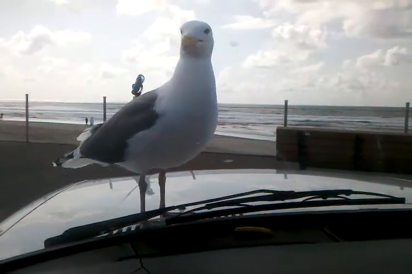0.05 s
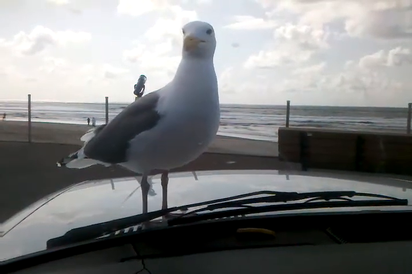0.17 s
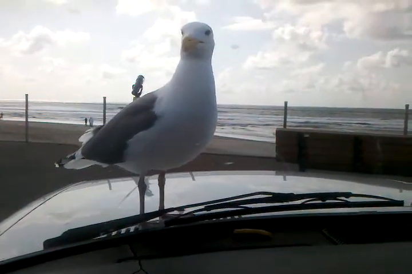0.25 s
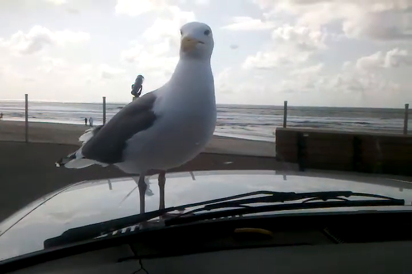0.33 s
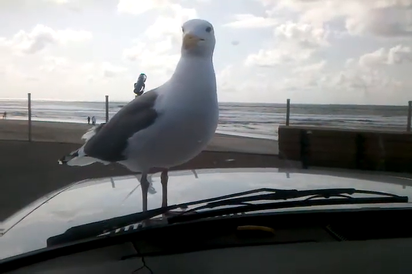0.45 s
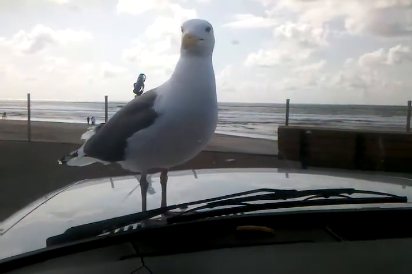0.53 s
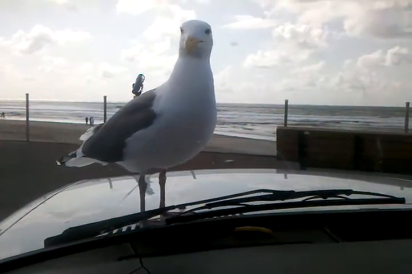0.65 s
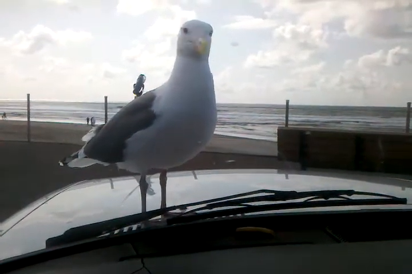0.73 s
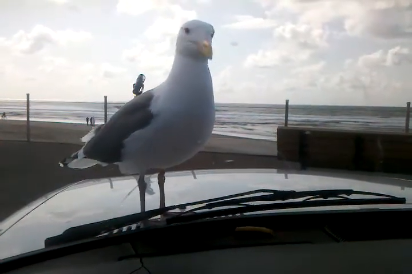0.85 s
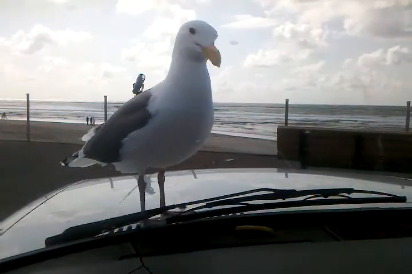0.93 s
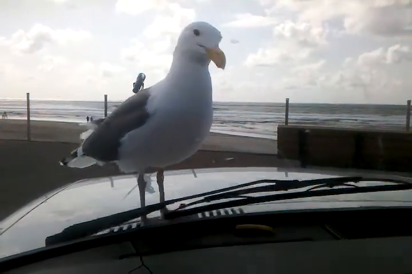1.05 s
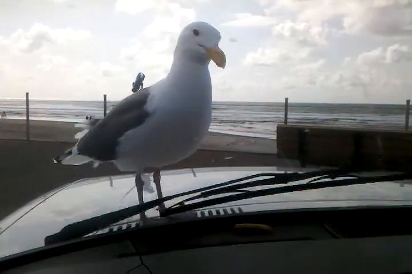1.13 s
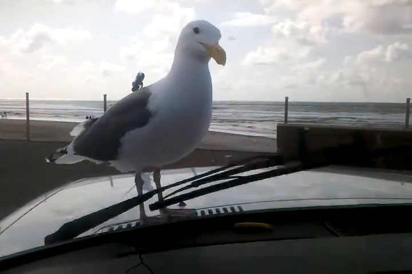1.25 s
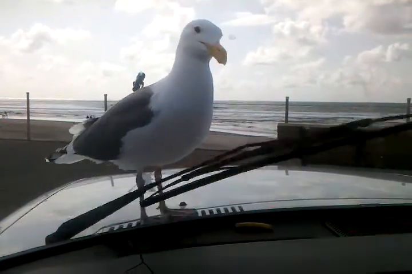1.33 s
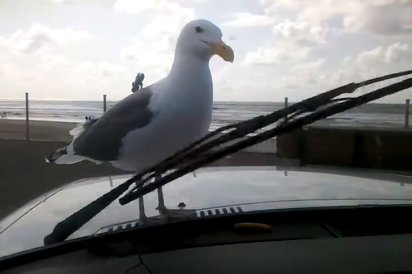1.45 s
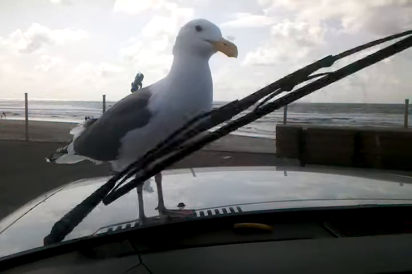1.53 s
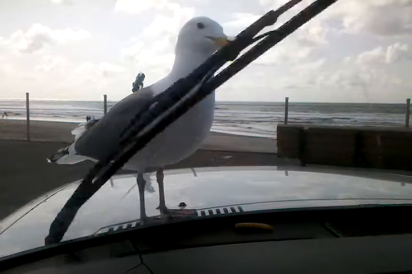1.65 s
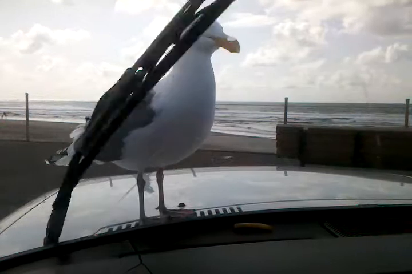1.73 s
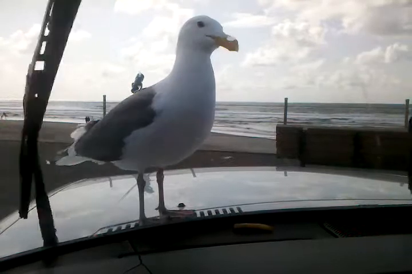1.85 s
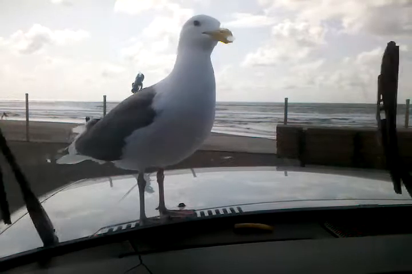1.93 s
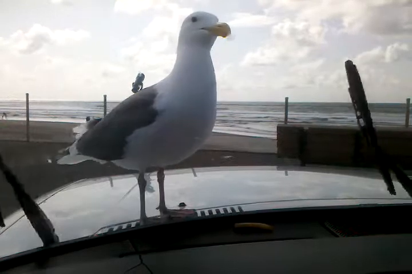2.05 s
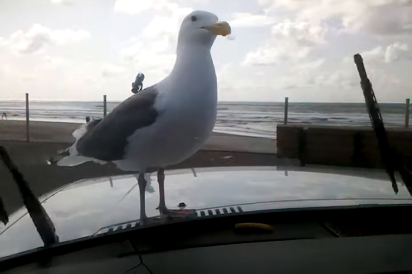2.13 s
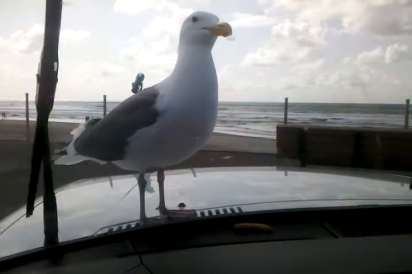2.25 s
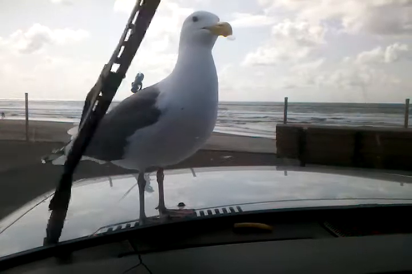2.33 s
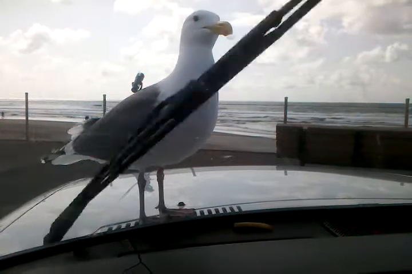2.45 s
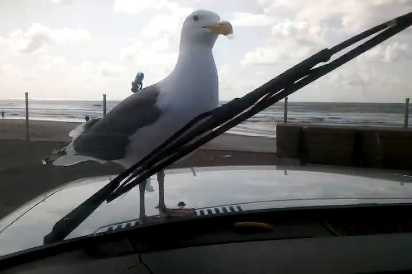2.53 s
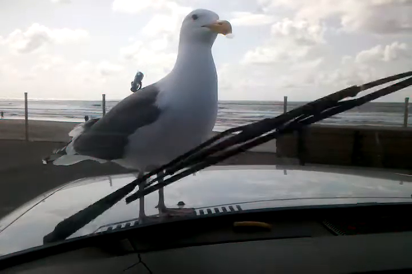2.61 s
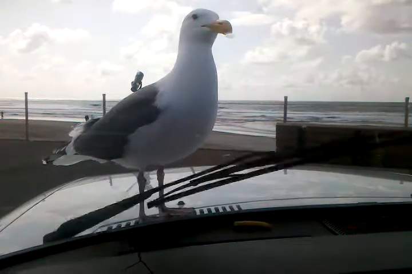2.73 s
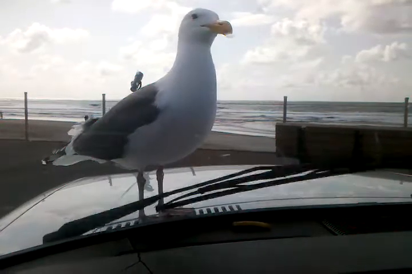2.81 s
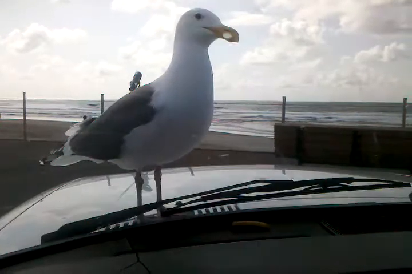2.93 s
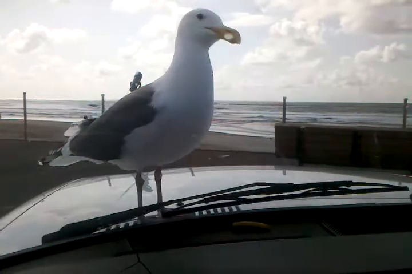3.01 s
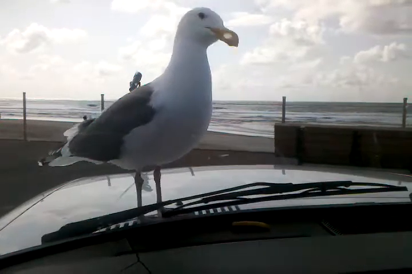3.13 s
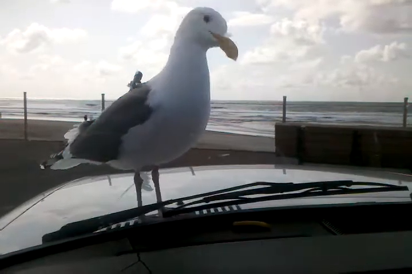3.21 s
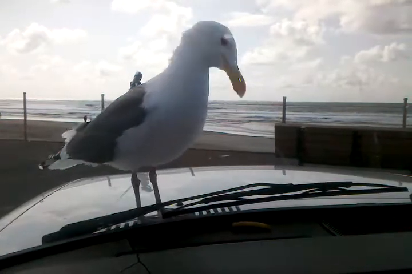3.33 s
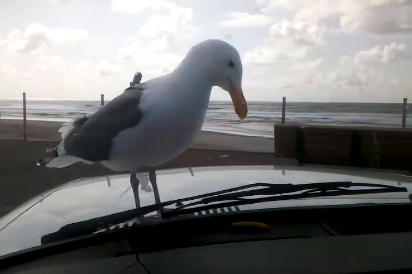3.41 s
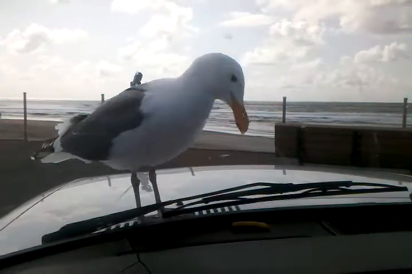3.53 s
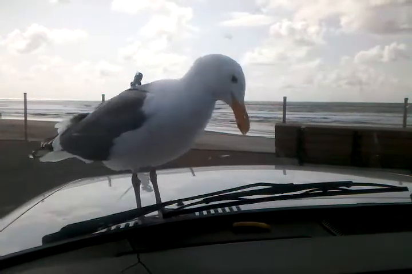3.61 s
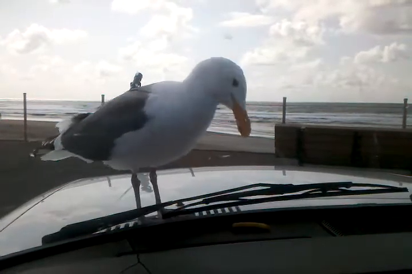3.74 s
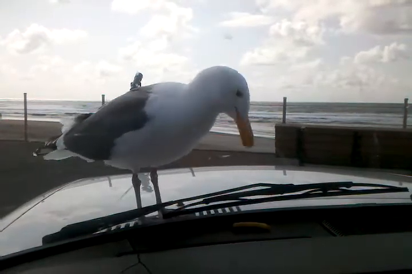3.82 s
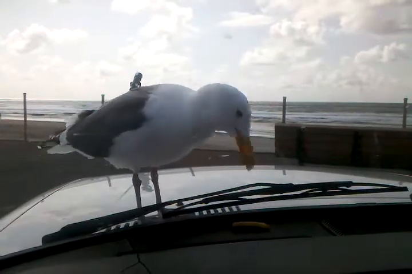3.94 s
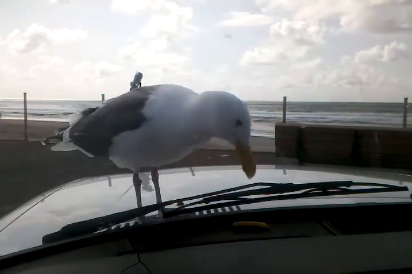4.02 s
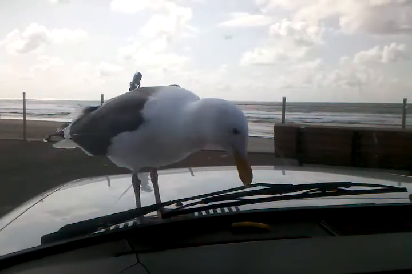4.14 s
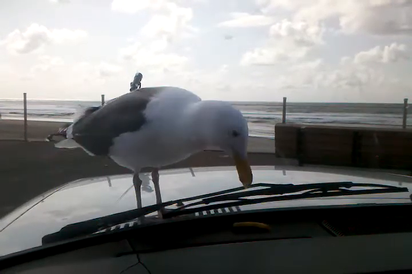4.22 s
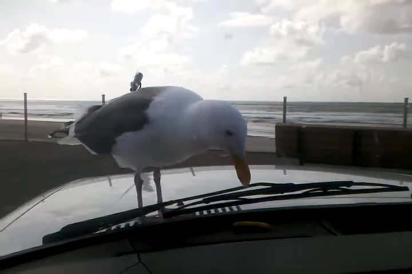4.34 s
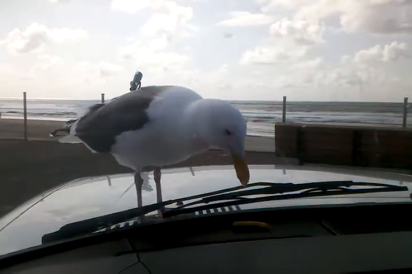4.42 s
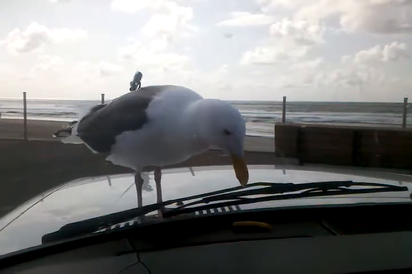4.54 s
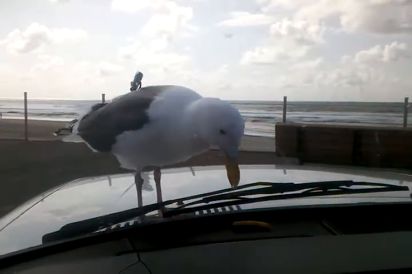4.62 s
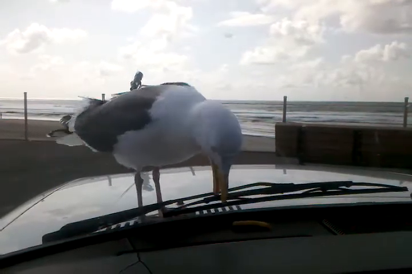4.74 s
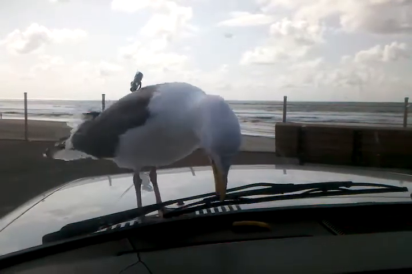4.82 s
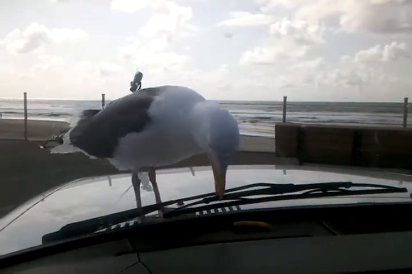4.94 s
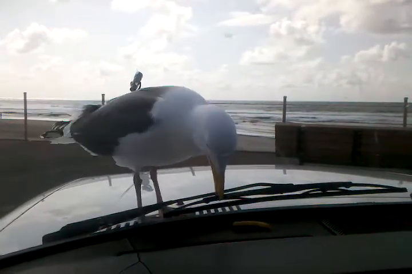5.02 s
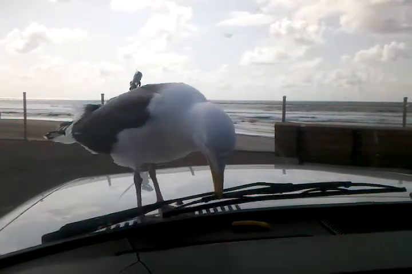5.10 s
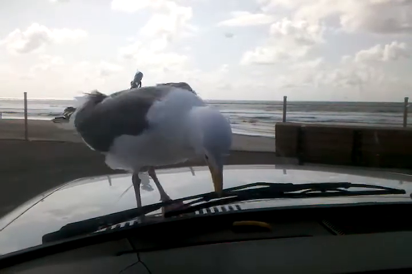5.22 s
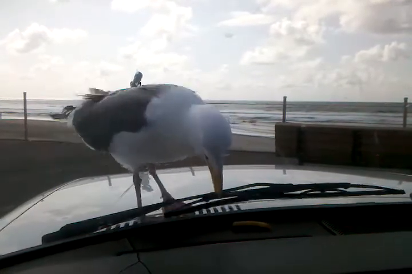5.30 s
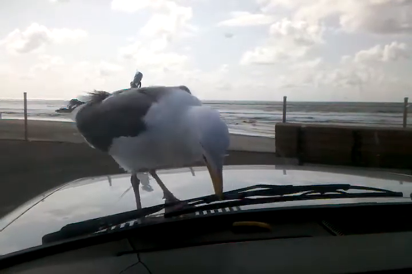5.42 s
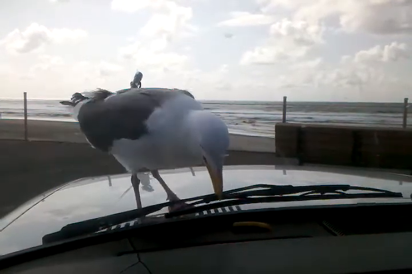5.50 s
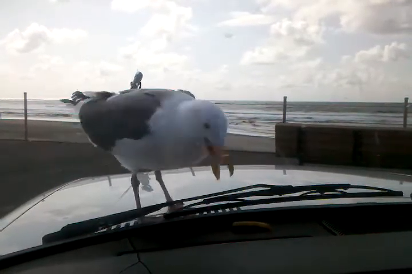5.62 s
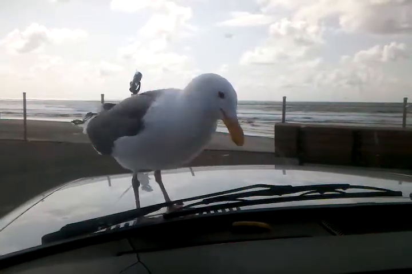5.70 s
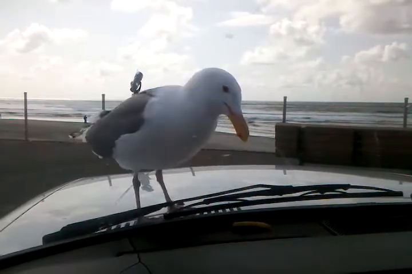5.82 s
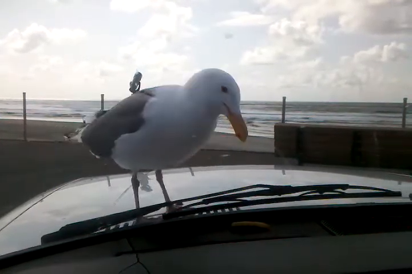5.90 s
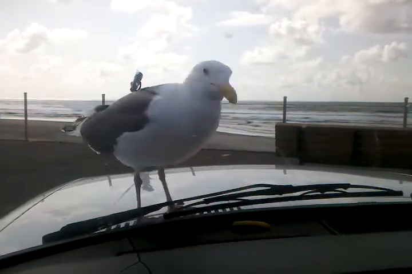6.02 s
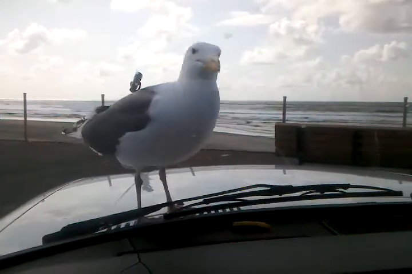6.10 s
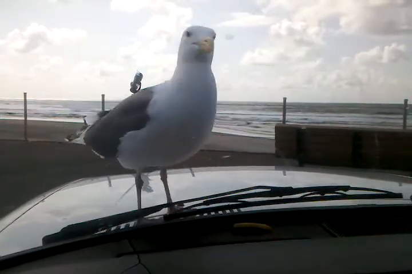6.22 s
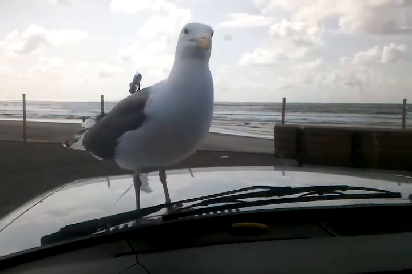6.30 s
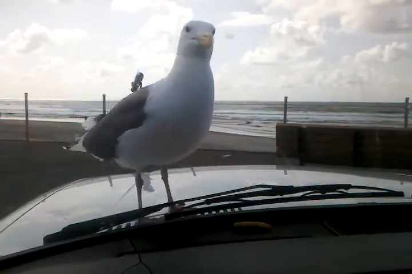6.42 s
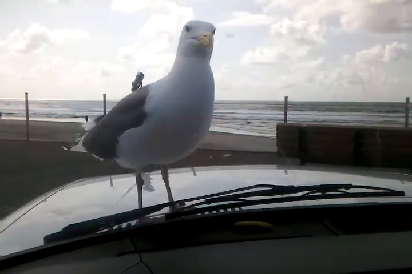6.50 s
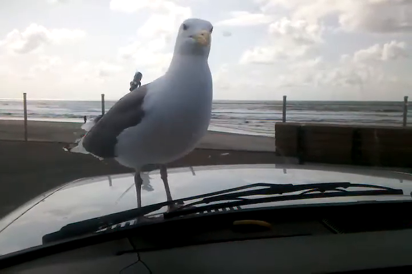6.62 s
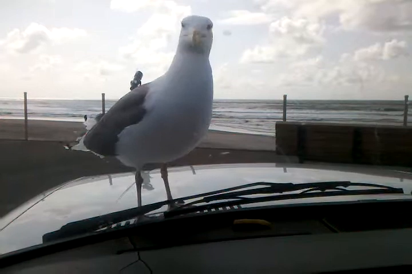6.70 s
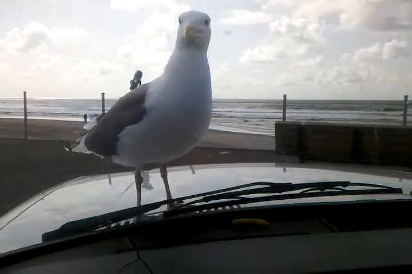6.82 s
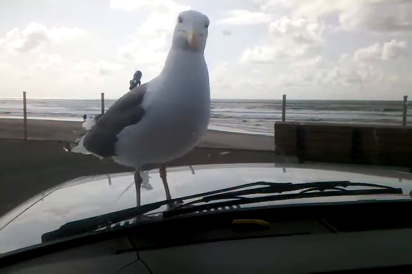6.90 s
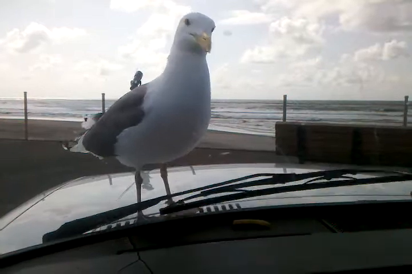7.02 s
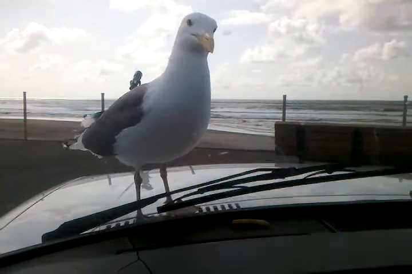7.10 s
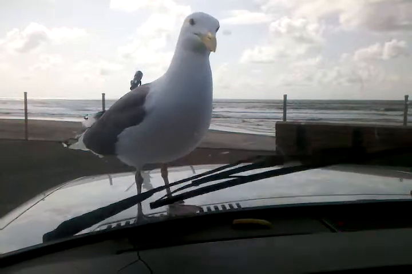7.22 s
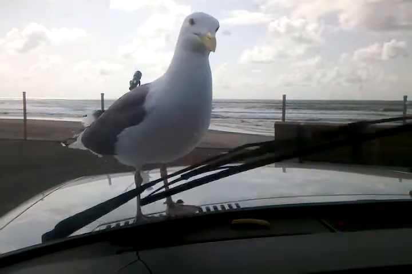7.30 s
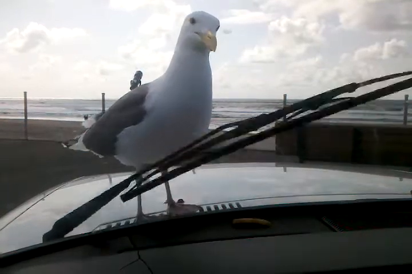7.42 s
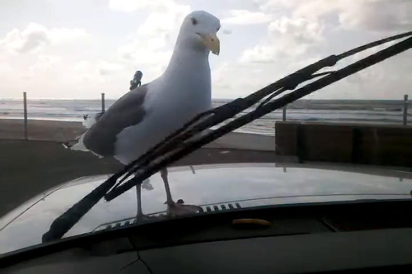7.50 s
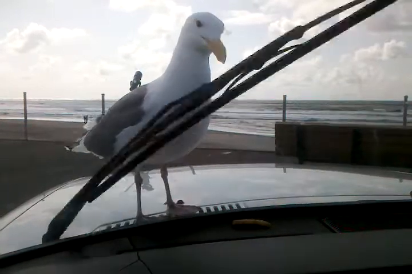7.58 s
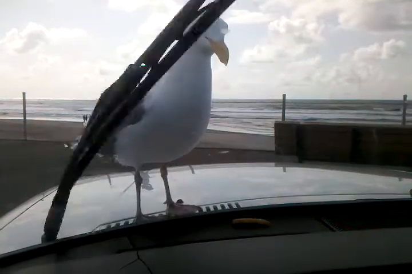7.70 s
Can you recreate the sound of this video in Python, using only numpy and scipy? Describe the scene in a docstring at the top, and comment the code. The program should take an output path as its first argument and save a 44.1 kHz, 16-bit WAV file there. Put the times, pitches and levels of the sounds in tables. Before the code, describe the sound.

Inside a closed car parked by the sea, steady, low, muffled surf with a faint hiss runs throughout. At about 1.1 s the wipers start: light ticks, then dull clunks at 1.2-1.4 s, low linkage rumble, and a soft gear whine and rubber swish swelling towards 1.8 s. A thin, wavering, high squeal appears around 1.9 s. Stronger clustered clunks mark the reversal at 2.35-2.45 s, followed by a quieter return and a small knock at 3.2 s. Only surf remains until the gull raps the hood at 5.0 and 5.1 s: hard, short, hollow metallic knocks. Soft foot thuds follow, heaviest at 5.7 s, then a third peck at 5.86 s with more cabin boom. A tiny grainy rustle passes at 6.4 s. From 7.1 s the wipers knock, chirp briefly and swish again until the end. The microphone is thin in bass and cut in the highs.

```python
"""Inside the cabin of a car parked by the sea, muffled surf (coloured noise) throughout; a gull is on the hood.
The wipers sweep out and back: knocks (damped sines, noise bursts), gear whine and swish (noise bands that follow
the blade speed), squeal (wavering tone). The gull then pecks the sheet metal three times (clicks into panel modes)
and stamps about (soft thuds); a brief grainy rustle follows, and the wipers start again."""
import sys
import numpy as np
from scipy import signal
from scipy.fft import rfft, irfft
from scipy.io import wavfile
from scipy.ndimage import uniform_filter1d

SR = 44100
rng = np.random.default_rng(int(sys.argv[2]) if len(sys.argv) > 2 else 0)


def dump_mix(stems):
    """Bounce the given channels to the path in sys.argv[1] as a 16-bit WAV at rate SR."""
    frames = np.atleast_2d(stems).T  # one column per channel
    limited = np.clip(frames, -1, 1)  # hard clip at full scale
    pcm = np.round(limited * 32767).astype(np.int16)
    wavfile.write(sys.argv[1], SR, pcm)


N = 341775
TIME = np.arange(N) / SR
AGE = TIME[:SR // 2]  # time since a blow
CUTOFF_HZ = 7050


def from_db(db):
    """Decibels to gain."""
    return 10 ** (np.asarray(db) / 20)


def rms_one(x):
    """Scale to unit rms."""
    return x / np.sqrt(np.mean(x ** 2) + 1e-20)


def during(start_s, end_s):
    """One between two times, with short fades."""
    return uniform_filter1d(1. * ((TIME > start_s) & (TIME < end_s)), size=800)


def swell(s, width_s):
    """Bell-shaped rise and fall around a moment; width to 1/e on either side."""
    return np.exp(-((TIME - s) / width_s) ** 2)


def at_hz(points, hz):
    """Read a table on a log-frequency axis."""
    f, value = np.transpose(points)
    return np.interp(np.log(hz + 0.0011), np.log(f), value)


def cut(x, hz, kind, order=2):
    """Butterworth low-, high- or band-pass."""
    return signal.sosfilt(signal.butter(order, hz, kind, fs=SR, output="sos"), x)


def noise(spectrum, count=N):
    """Noise of a given colour, rms 1, empty above 9/8 of the cut-off."""
    hz = np.linspace(0, SR / 2, count // 2 + 1)
    gain = from_db(at_hz(spectrum, hz)) * (hz < CUTOFF_HZ * 9 / 8)
    return rms_one(irfft(rfft(rng.standard_normal(count)) * gain, count))


def narrow_noise(hz, width_hz):
    """Noise around a steady or moving pitch, rms 1."""
    white = rng.standard_normal(N) + 1j * rng.standard_normal(N)
    wobble = cut(white, width_hz / 2, "low")
    carrier = np.exp(2j * np.pi * np.cumsum(hz * np.ones(N)) / SR)
    return rms_one(np.real(wobble * carrier))


def drift(knots_per_s):
    """Random wander: straight lines between normal draws of spread 1."""
    knots = rng.standard_normal(N // 10)
    return np.interp(TIME * knots_per_s, np.arange(len(knots)), knots)


def ring(push, hz, t60_s):
    """Two-pole resonator: a unit click sets a sine of height 1 ringing."""
    r, w = from_db(-60 / (t60_s * SR)), 2 * np.pi * hz / SR
    return signal.lfilter([0, np.sin(w)], [1, -2 * r * np.cos(w), r * r], push + 1e-18)


def modes(push, table):
    """A body answers in all its modes; neighbouring modes swing in opposite directions."""
    return sum((-1) ** k * from_db(db) * ring(push, hz, t60_s) for k, (hz, db, t60_s) in enumerate(table))


def add(out, s, sound):
    """Mix a sound in at a given time."""
    i = int(s * SR)
    out[i:i + len(sound)] += sound[:N - i]


# decay of the reflections: (frequency [Hz], T60 [s])
CABIN_DECAY = [(100, 0.42), (250, 0.2), (600, 0.085), (1500, 0.084), (6000, 0.14)]


def contact(wet_db):
    """A click followed by its dense reflections in body and cabin; the lows linger."""
    edges_hz = [70, 160, 400, 1000, 4000]
    reflections = np.zeros(len(AGE))
    for low, high in zip(edges_hz, edges_hz[1:]):
        t60_s = at_hz(CABIN_DECAY, np.sqrt(low * high))
        fade = np.exp(-np.log(1000) * AGE / t60_s) * (1 - np.exp(-AGE / 0.00085))
        grains = rng.standard_normal(len(AGE)) * fade / np.linalg.norm(fade)
        reflections += cut(grains, [low, high], "band")
    return (AGE == 0) + from_db(wet_db) * reflections


# beak on hood: (time [s], panel [dB], tip crack [dB], contact softness cut-off [Hz], cabin boom [dB])
PECKS = [(4.9830, -16.5, -21.5, 860, -46.5), (5.1250, -10.5, -25.5, 720, -42.5),
         (5.8638, -16.5, -28.5, 1200, -36)]
# dent response and long faint ring of the hood: (frequency [Hz], level [dB], T60 [s])
HOOD_MODES = [(124.6, -39.5, 0.24), (162, -5.5, 0.081), (206.7, -13.5, 0.059), (343, -37.5, 0.88),
              (440, 2.5, 0.013), (540, -11, 0.025), (703, -47.5, 1.1), (790, -10, 0.017), (934, -18, 0.047),
              (1066, -18.5, 0.074), (1170, -46, 0.35), (1477, -28, 0.054), (1825, -18.5, 0.045)]
# bright ringing of beak and trim: (frequency [Hz], level [dB], T60 [s])
TIP_MODES = [(2860, -34, 0.032), (3220, -32, 0.036), (4300, -33, 0.02), (6100, -24.5, 0.034)]
# air modes of the cabin: (frequency [Hz], level [dB], T60 [s])
CABIN_MODES = [(101.4, -10, 0.34), (123.3, -9, 0.64), (146, -5, 0.15)]
# colour of the beak crack: (frequency [Hz], level [dB])
CRACK_COLOUR = [(300, 10), (1500, 1.5), (2300, -3.5), (3000, 1), (3500, -7), (4500, 5), (5400, -3),
                (6800, -13), (8000, -7)]


def pecks(wet_db=-8, crack_s=0.00055, splash_db=-14, splash_s=0.01, ring_db=-3):
    """The hard tip cracks, then the dented panel springs back and the cabin booms."""
    panel_push, tip_push, cabin_push, cracks = np.zeros((4, N))
    for s, panel_db, tip_db, soft_hz, boom_db in PECKS:
        blow = contact(wet_db)
        add(panel_push, s, from_db(panel_db) * cut(blow, soft_hz, "low"))
        add(tip_push, s, from_db(tip_db + ring_db) * blow)
        add(cabin_push, s, from_db(boom_db) * blow)
        fade = np.exp(-AGE / crack_s) + from_db(splash_db) * np.exp(-AGE / splash_s)
        add(cracks, s, from_db(tip_db) * noise(CRACK_COLOUR, count=len(AGE)) * fade)
    panel = modes(cut(panel_push, 222, "high", order=3), HOOD_MODES)
    tip = cut(cracks + modes(tip_push, TIP_MODES), 500, "high")
    return panel + tip + modes(cabin_push, CABIN_MODES)


# loss and drop in pitch are per settling time
REBOUND_S, SETTLE_LOSS_DB, SAG_OCTAVES = .016, 18, 0.32


def rebounds(rows, count=4):
    """A knock settles in ever weaker, deeper rebounds: (s, thud dB, pitch Hz, rattle dB)."""
    for s, thud_db, hz, rattle_db, settle_s in rows:
        jitter = rng.uniform(-.2, .2, count) * (np.arange(count) > 0)  # first contact stays on time
        for delay_s in REBOUND_S * (np.arange(count) + jitter):
            settled = delay_s / settle_s
            loss_db = SETTLE_LOSS_DB * settled
            pitch_hz = hz / 2 ** (SAG_OCTAVES * min(settled, 1))
            yield s + delay_s, thud_db - loss_db, pitch_hz, rattle_db - loss_db


# colour of the rattle: (frequency [Hz], level [dB])
RATTLE_COLOUR = [(400, -0.5), (1200, 1.5), (1800, 3.5), (2400, 0), (3200, 3.5), (5200, 7.5), (6800, 2),
                 (8000, -20)]
# scuff of the touching surfaces: (frequency [Hz], level [dB])
SCUFF_COLOUR = [(350, -26.5), (700, 10), (1300, 2.5), (1900, -8.5), (2700, -17.5), (6000, -31)]


def knocks(rows, cycles, soft_hz, hood_db, boom_db, rattle_s, scuff_db,
           overtone=1.66, overtone_db=-10, scuff_s=0.012):
    """Blunt blows: a damped thud and its overtone, which also stir hood and cabin, with rattle and scuff."""
    out, hood_push, cabin_push = np.zeros((3, N))
    for s, thud_db, hz, rattle_db in rebounds(rows):
        push = from_db(thud_db) * cut(cut(contact(wet_db=0.5), soft_hz, "low"), 115, "high")
        t60_s = cycles / hz
        thud = ring(push, hz, t60_s) - from_db(overtone_db) * ring(push, overtone * hz, t60_s)
        rattle_fade = np.exp(-AGE / rattle_s) * (1 - np.exp(-AGE / 0.00076))
        rattle = noise(RATTLE_COLOUR, count=len(AGE)) * rattle_fade
        # high-pitched, sharp blows scuff most
        scuff = noise(SCUFF_COLOUR, count=len(AGE)) * np.exp(-AGE / scuff_s) * hz / soft_hz
        add(out, s, thud + from_db(rattle_db) * rattle + from_db(thud_db + scuff_db) * scuff)
        add(hood_push, s, push)
        add(cabin_push, s, push * CABIN_MODES[0][0] / hz)  # deep blows boom most
    hood = from_db(hood_db) * modes(hood_push, HOOD_MODES)
    return out + hood + from_db(boom_db) * modes(cabin_push, CABIN_MODES)


# webbed feet on hood: (time [s], thud [dB], thud pitch [Hz], claw [dB], settling time [s])
STEPS = [(5.193, -44.5, 440, -82, .015), (5.399, -41, 435, -69, .03), (5.432, -37.5, 191, -67, 0.013),
         (5.4551, -34, 247, -56, 0.018), (5.495, -41.5, 118, -76, 0.036), (5.637, -41, 540, -75, 0.081),
         (5.6985, -24.5, 508, -58, 0.025), (5.7135, -20, 251, -65, 0.017), (5.728, -30, 183, -76, .015),
         (5.739, -48, 188, -54, 0.012), (5.828, -45.5, 487, -71, 0.088), (5.905, -39.5, 151, -75, 0.022)]


def footsteps():
    """Feet thud on the sheet metal; the claws are the rattle."""
    return knocks(STEPS, cycles=5.3, soft_hz=1160, hood_db=-7, boom_db=-10.5, rattle_s=0.01, scuff_db=-9.0)


# linkage and blades: (time [s], thud [dB], thud pitch [Hz], rattle [dB], settling time [s])
WIPER_KNOCKS = [(1.094, -52, 410, -50.5, .01), (1.1021, -45.5, 400, -39.5, 0.019),
                (1.2101, -30, 500, -48, 0.018), (1.2151, -32, 290, -51.5, 0.022),
                (1.2471, -34.5, 586, -74, 0.013), (1.2721, -31, 476, -65, 0.044),
                (1.354, -54, 392, -47.5, 0.013), (1.372, -36.5, 450, -64, 0.021),
                (2.136, -42.5, 890, -64, .015), (2.3421, -30, 400, -80, 0.03),
                (2.3641, -22, 364, -71, 0.04), (2.3991, -20.5, 550, -51.5, 0.034),
                (2.4311, -23, 260, -58, 0.014), (2.4451, -26.5, 162, -51.5, 0.013),
                (3.1851, -38, 241, -60.5, 0.019), (7.061, -51, 446, -44.5, 0.0071),
                (7.1956, -24.5, 540, -51.5, 0.033), (7.2006, -29, 270, -52, 0.028),
                (7.2646, -27, 513, -60, .035), (7.380, -45.5, 440, -49.5, 0.021)]


def wiper_knocks():
    """Wiper linkage and blades knock as shorter-ringing thuds."""
    return knocks(WIPER_KNOCKS, cycles=3.9, soft_hz=1250, hood_db=-9.5, boom_db=-6.5, rattle_s=0.008,
                  scuff_db=-10.0)


# blade flipping over: (time [s], pitch [Hz], level [dB], decay either side [s])
CHIRPS = [(1.128, 1850, -54.5, 0.0056), (1.373, 1375, -41.5, 0.006), (2.403, 1280, -44, 0.004),
          (2.493, 1530, -42, 0.0058), (3.188, 1490, -45, 0.0051), (7.392, 1340, -44.5, 0.0068)]


def chirps(width_hz=420):
    """The rubber lip judders for a moment as it turns over: a short band of noise."""
    out, middle_s = np.zeros(N), AGE.mean()
    for s, hz, db, width_s in CHIRPS:
        band_hz = [hz - width_hz / 2, hz + width_hz / 2]
        judder = rms_one(cut(rng.standard_normal(len(AGE)), band_hz, "band", order=3))
        add(out, s - middle_s, from_db(db) * np.exp(-np.abs(AGE - middle_s) / width_s) * judder)
    return out


# rubber on dry glass: (time [s], pitch [Hz], level [dB])
SQUEAL = [(1.81, 2859, -67), (1.828, 2950, -54), (1.842, 2931, -67), (1.854, 2762, -64), (1.89, 2900, -63),
          (1.906, 2800, -46), (1.936, 2772, -44), (1.99, 2850, -51.5), (2.04, 2910, -68)]


def squeal(jitter=0.0044, octave_db=-21, grip_db=-52, stutter_db=4):
    """Stick and slip of the blade: a wavering tone and its octave, stuttering until the rubber grips."""
    s, pitch_hz, level_db = np.transpose(SQUEAL)
    hz, db = np.interp(TIME, s, pitch_hz), np.interp(TIME, s, level_db)
    loose = 1 / (1 + from_db(2 * (db - grip_db)))  # 1 when faint, 0 when loud
    phase = 2 * np.pi * np.cumsum(hz * (1 + jitter * (1 + 3 * loose) * drift(400))) / SR
    tone = np.sin(phase) + from_db(octave_db) * np.sin(2 * phase)
    level = np.sqrt(2) * from_db(db + stutter_db * loose * drift(120))
    return during(s[0], s[-1]) * level * tone


# motor runs: (on [s], off [s])
WIPER_RUNS = [(1.093, 3.31), (7.085, 9.3)]
TURN_S, TURN_SWING_HZ, TURN_SWING_DB = .173, 19, 2.5  # the load swings once per gear turn


def gear_whine(arcs, speed, rest_hz=1644, rise_hz=120, rest_db=-70, rise_db=-1.5, width_hz=40, onset=0.5):
    """Narrow noise under the load of each stroke; pitch and level follow blade speed and gear turn."""
    turn = sum(during(on, off) * np.cos(2 * np.pi * (TIME - on) / TURN_S) for on, off in WIPER_RUNS)
    gear = narrow_noise(rest_hz + rise_hz * speed + TURN_SWING_HZ * turn, width_hz)
    return sum(arcs) ** onset * from_db(rest_db + rise_db * speed + TURN_SWING_DB * turn) * gear


# blade crossing the glass: (start [s], length [s], top speed [share of full speed])
STROKES = [(1.375, 0.93, 0.93), (2.431, .7, 0.21), (7.391, 0.67, 0.73)]
# colour of the swish: (frequency [Hz], level [dB])
SWISH_COLOUR = [(500, -9.5), (1000, 8.5), (1500, 2), (2400, -4), (4500, 1), (6900, -5), (8000, 4)]


def blade_swish(speed, idle_db=-74, full_db=-61, drag_db=-68.5, drag_peak_s=0.077, drag_width_s=0.093):
    """Rubber noise in proportion to speed over an idle floor, plus drag just after it sets off."""
    drag = from_db(drag_db) * sum(swell(s + drag_peak_s, drag_width_s) for s, _, _ in STROKES)
    level = np.sqrt(from_db(idle_db) ** 2 + (from_db(full_db) * speed) ** 2 + drag ** 2)
    return level * noise(SWISH_COLOUR)


# patches of glass: (middle [s], half width [s], level [dB])
CHATTER = [(1.775, 0.072, -69), (2.14, .06, -73.5), (7.74, 0.14, -72.5)]
# blade resonances: (frequency [Hz], width [Hz], level [dB])
BLADE_BANDS = [(900, 79, 8), (1850, 320, 1.5), (2930, 300, -6)]


def blade_chatter(ragged_db=4):
    """The blade chatters on patches of glass: its resonances with a ragged level."""
    patches = sum(from_db(db) * swell(s, width_s) for s, width_s, db in CHATTER)
    blade = sum(from_db(db) * narrow_noise(hz, width_hz) for hz, width_hz, db in BLADE_BANDS)
    return from_db(ragged_db * drift(90)) * patches * blade


# colour of the linkage rumble: (frequency [Hz], level [dB])
RUMBLE_COLOUR = [(40, -28.5), (80, -20), (120, 2), (190, -2.5), (280, -6), (450, -10.5), (700, -18),
                 (1500, -30)]


def wiper_run(rumble_db=-60.5, peakiness=4.3):
    """The linkage rumbles while the motor runs; blade speed, a half sine to a power, drives whine and swish."""
    arcs = [np.maximum(np.sin(np.pi * np.clip((TIME - s) / length_s, 0, 1)), 0) for s, length_s, _ in STROKES]
    speed = sum(top * arc ** peakiness for arc, (_, _, top) in zip(arcs, STROKES))
    running = sum(during(on, off) for on, off in WIPER_RUNS)
    rumble = from_db(rumble_db) * noise(RUMBLE_COLOUR)
    return running * (gear_whine(arcs, speed) + blade_swish(speed) + rumble) + blade_chatter()


def rustle(s=6.385, width_s=0.045, level_db=-65.0, grain_db=1.5):
    """A brief soft, grainy, high rustle: noise with a flickering level."""
    colour = [(1500, -16), (3500, -13), (4800, -5), (7000, -4)]  # (frequency [Hz], level [dB])
    return from_db(level_db + grain_db * drift(200)) * swell(s, width_s) * noise(colour)


# colour of surf and hiss: (frequency [Hz], level [dB])
SURF_COLOUR = [(15, -90), (25, -29), (91, -15.5), (116, -4.5), (154, -8), (190, -1), (209, -7.5),
               (229, -11.5), (264, -9.5), (413, -15.5), (465, -13.5), (549, -18), (1740, -25.5),
               (2480, -30.5), (7000, -33.5), (9100, -55.5), (15400, -120)]


def surf(level_db=-62.5):
    """The sea through closed windows with a faint hiss: steady noise, mostly low."""
    return from_db(level_db) * noise(SURF_COLOUR)


def scene():
    """Gull, wipers, rustle and sea."""
    gull = pecks() + footsteps()
    wipers = wiper_knocks() + chirps() + squeal() + wiper_run()
    return (gull + wipers + rustle() + surf())[None]


def record(dry):
    """A narrow-band microphone: the deep bass falls away and the top is cut steeply."""
    thin = cut(dry, 57, "high", order=3)
    return signal.sosfilt(signal.cheby1(11, .3, CUTOFF_HZ, fs=SR, output="sos"), thin)


dry = scene()
out = record(dry)
dump_mix(out)
```